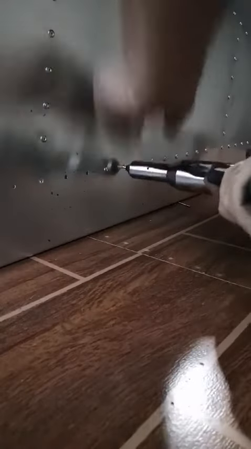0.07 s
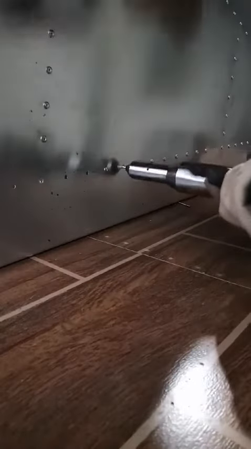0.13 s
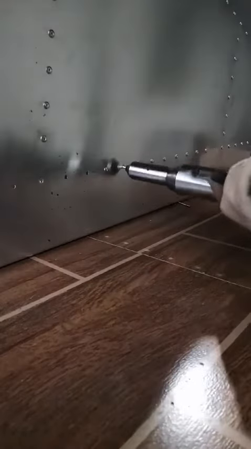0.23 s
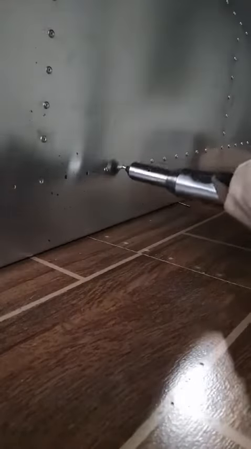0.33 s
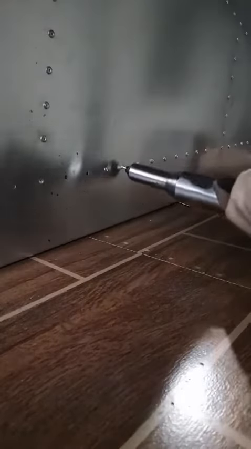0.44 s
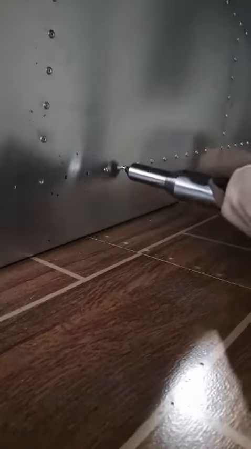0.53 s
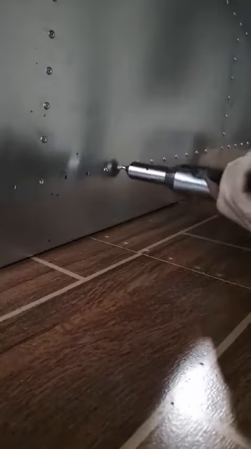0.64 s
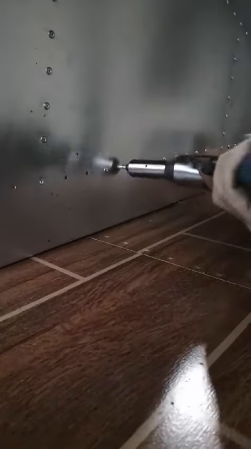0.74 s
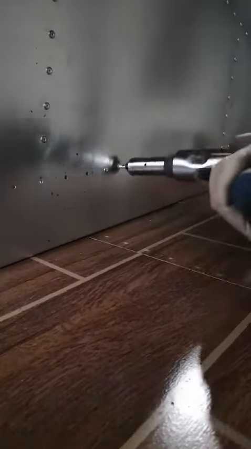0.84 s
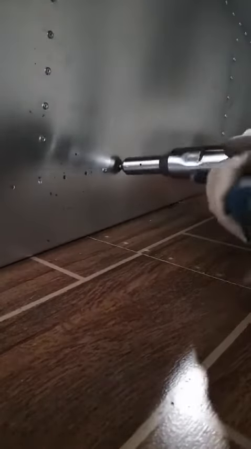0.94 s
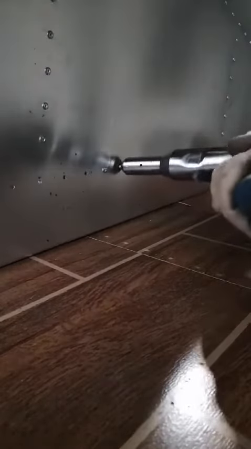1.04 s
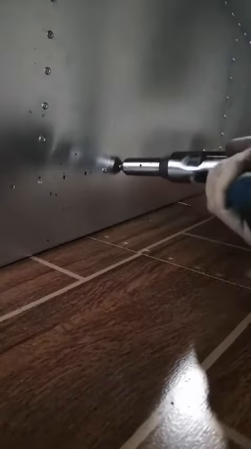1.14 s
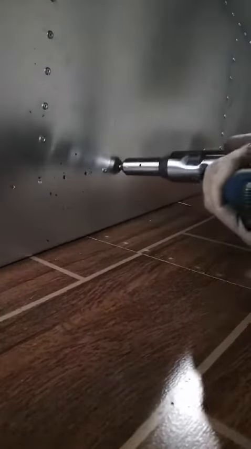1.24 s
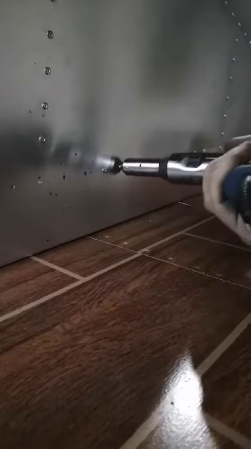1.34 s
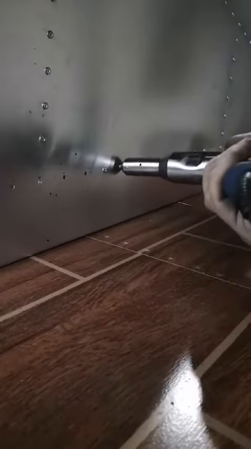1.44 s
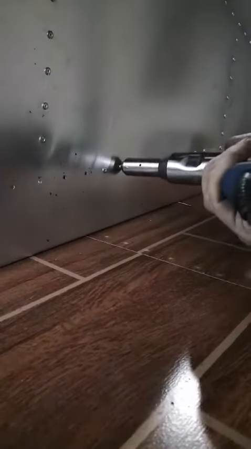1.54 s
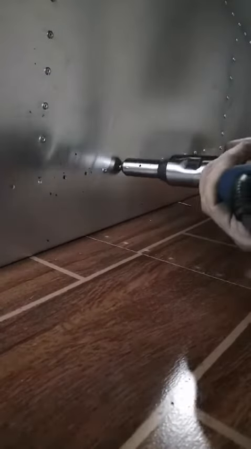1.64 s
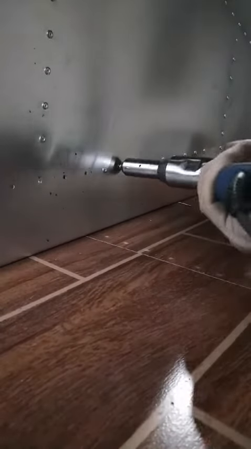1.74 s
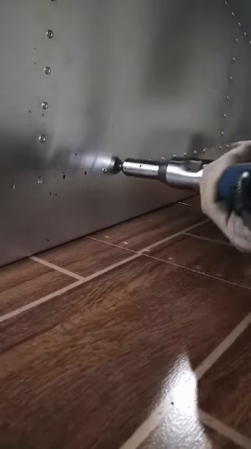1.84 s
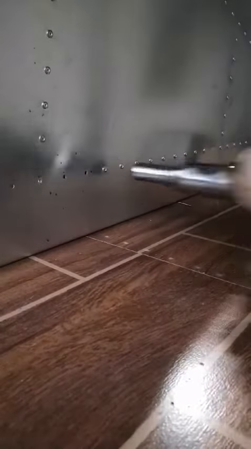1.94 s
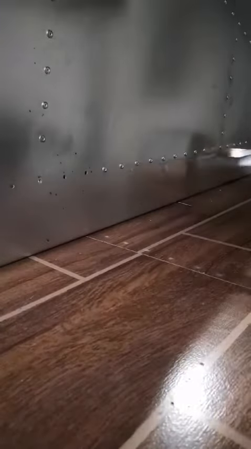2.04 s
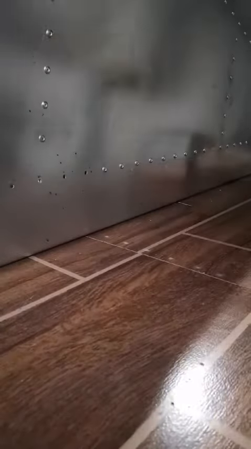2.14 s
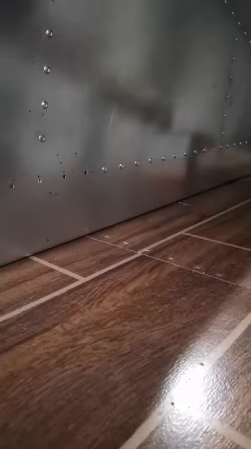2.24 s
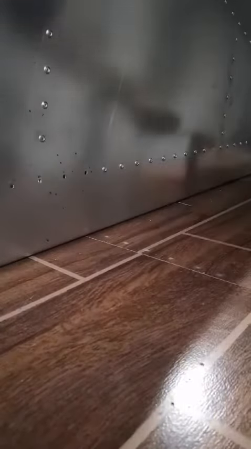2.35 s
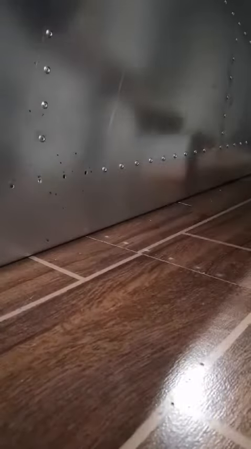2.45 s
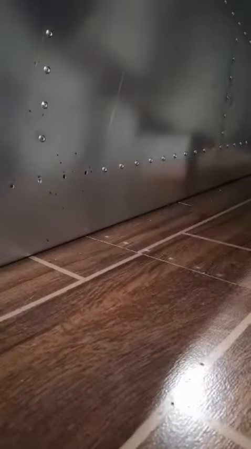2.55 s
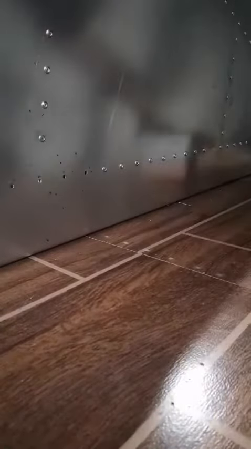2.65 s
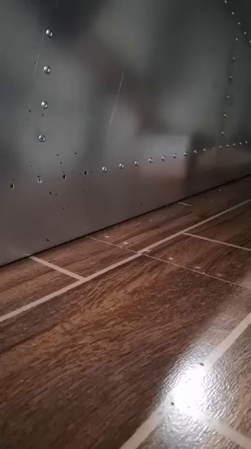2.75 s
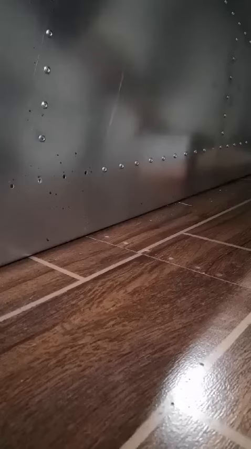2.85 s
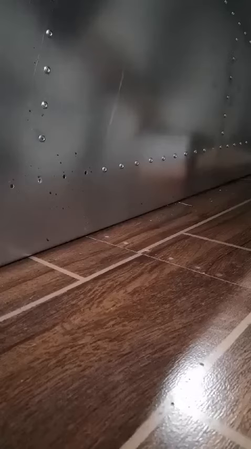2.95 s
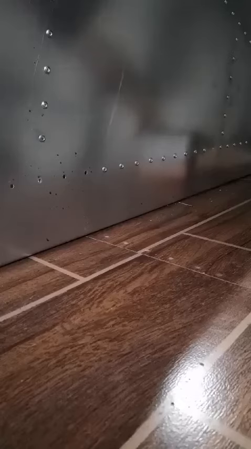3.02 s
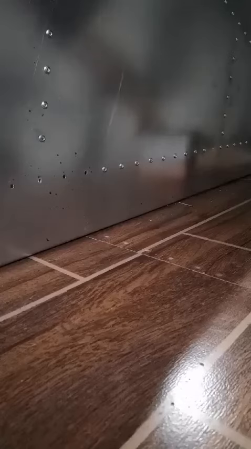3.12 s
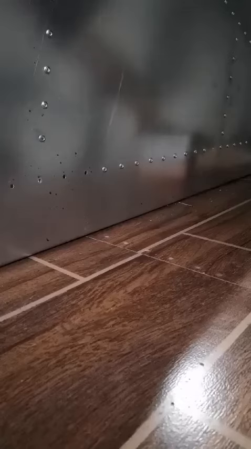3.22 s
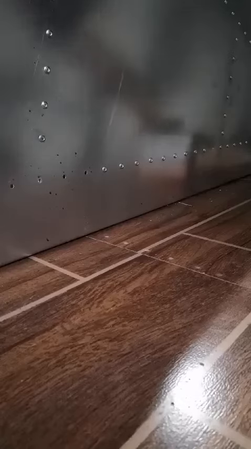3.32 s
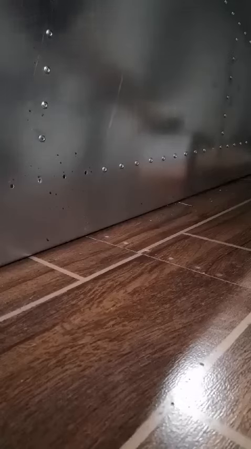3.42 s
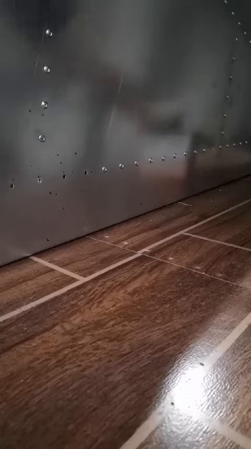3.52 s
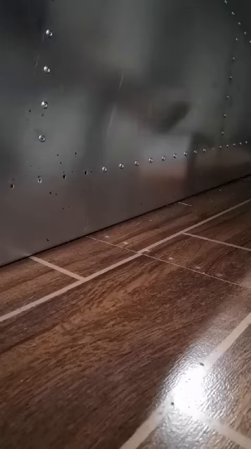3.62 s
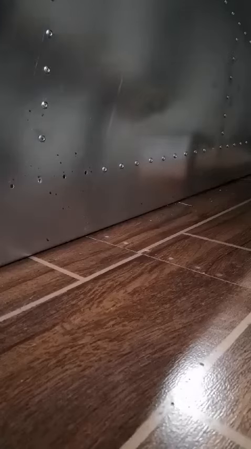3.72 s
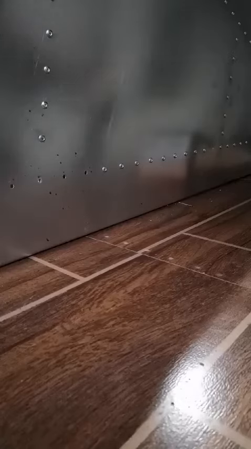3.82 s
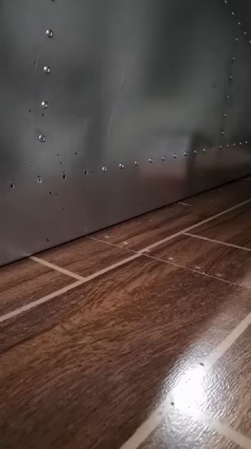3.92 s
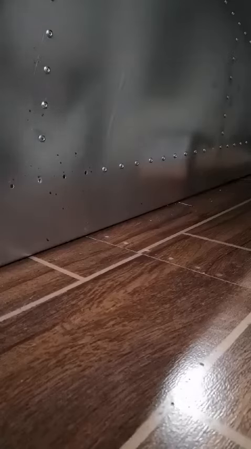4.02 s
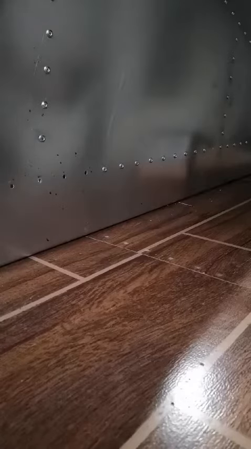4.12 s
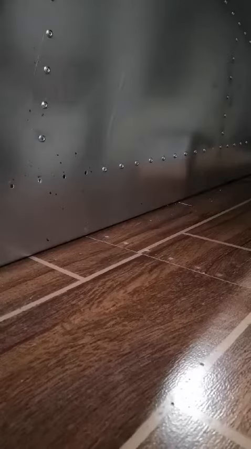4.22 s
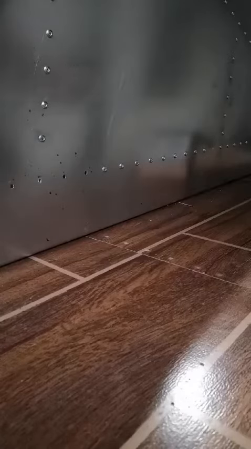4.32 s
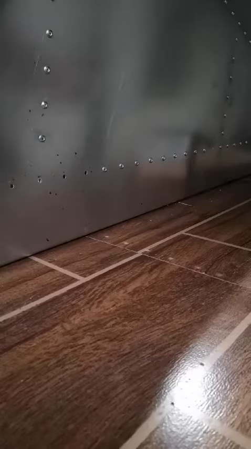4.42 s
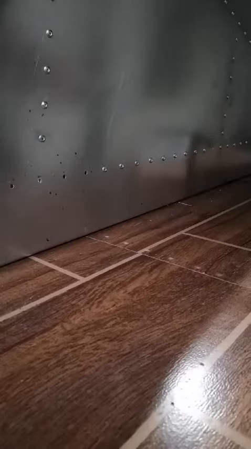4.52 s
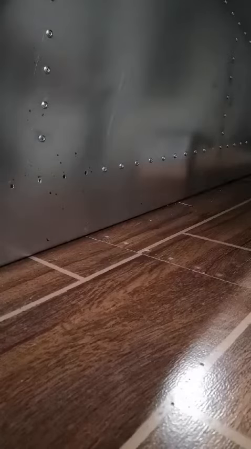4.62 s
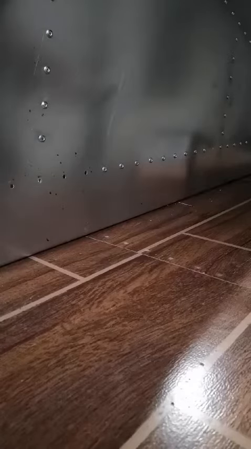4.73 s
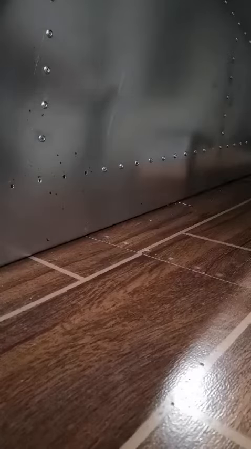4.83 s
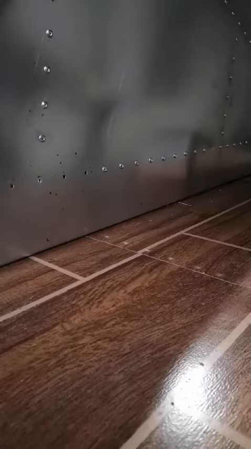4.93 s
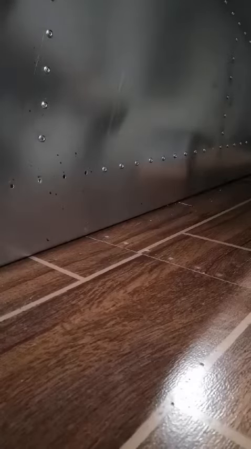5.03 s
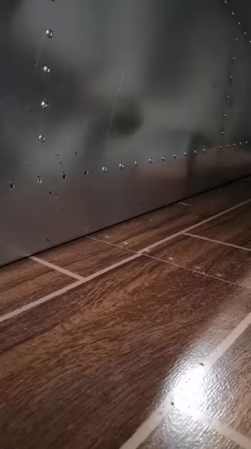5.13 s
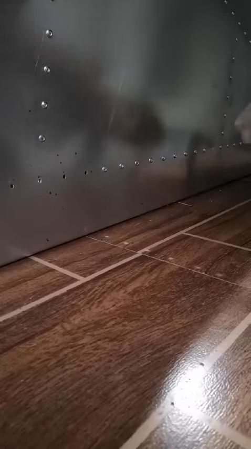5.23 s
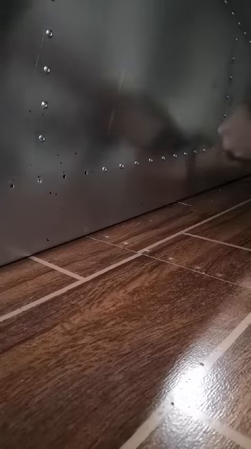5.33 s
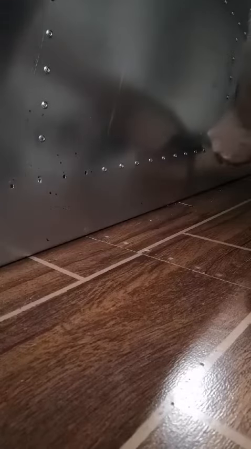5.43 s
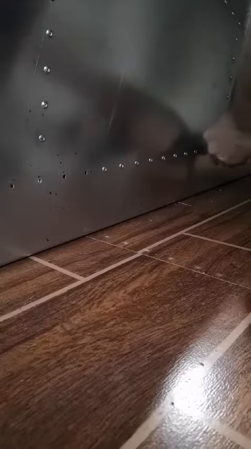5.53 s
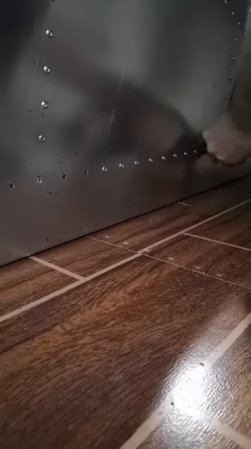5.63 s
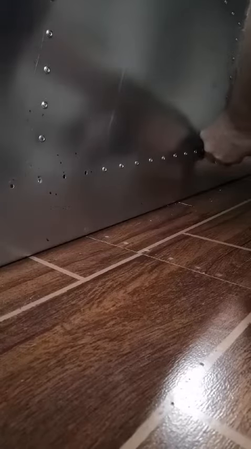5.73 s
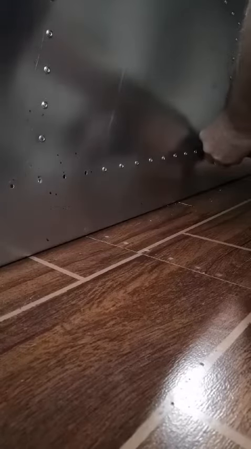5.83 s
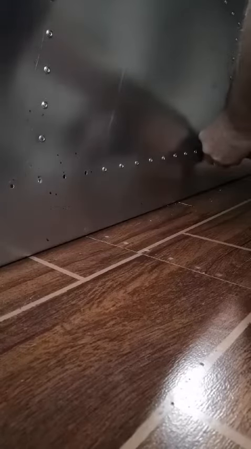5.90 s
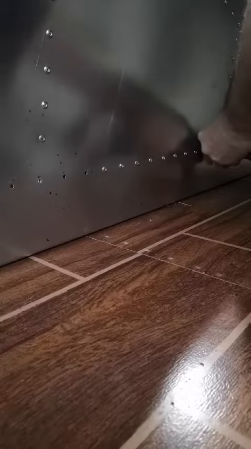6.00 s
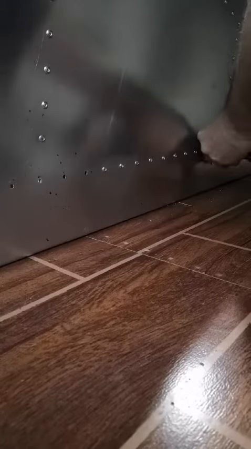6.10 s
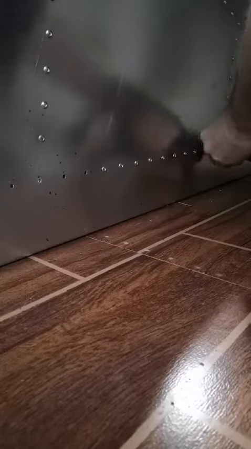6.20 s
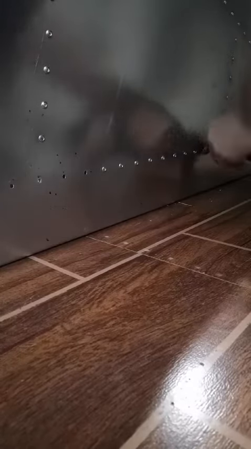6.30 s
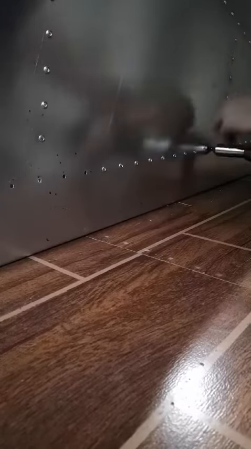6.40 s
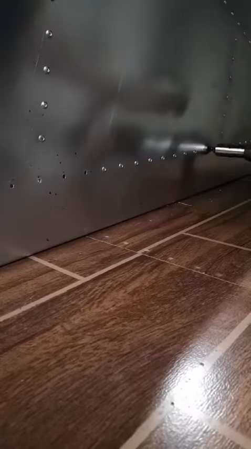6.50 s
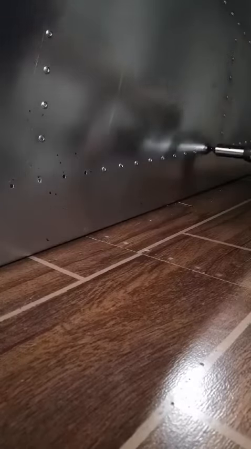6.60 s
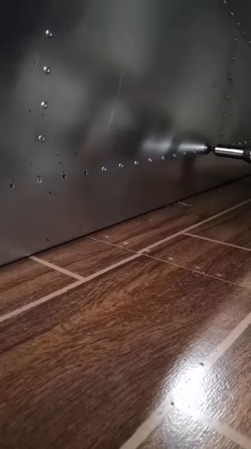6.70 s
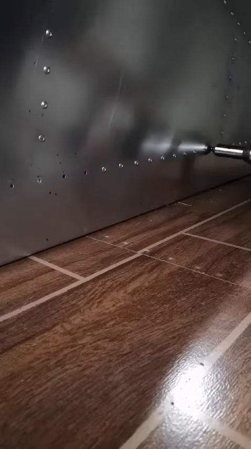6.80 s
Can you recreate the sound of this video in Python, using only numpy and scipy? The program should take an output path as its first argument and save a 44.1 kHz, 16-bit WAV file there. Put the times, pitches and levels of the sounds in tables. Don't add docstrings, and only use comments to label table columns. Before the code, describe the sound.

Steady compressed-air hiss with a high motor whine, dull booming bumps on sheet metal, a brief sagging pull, and a sharp metallic clack.

```python
import sys
import numpy as np
from scipy import signal
from scipy.fft import rfft, irfft, next_fast_len
from scipy.io import wavfile
from scipy.ndimage import uniform_filter1d, map_coordinates

SR = 44100
rng = np.random.default_rng(int(sys.argv[2]) if len(sys.argv) > 2 else 0)


def waveform_to_disk(signal):
    frames = np.transpose(np.atleast_2d(signal))
    scaled = np.clip(frames, -1, 1) * 32767
    samples = np.round(scaled).astype(np.int16)
    wavfile.write(sys.argv[1], SR, samples)


def ratio_of_db(decibels):
    return 10 ** (np.asarray(decibels, float) / 20)


N = 302526

# time in seconds, exhaust level in dB, nearness to the sheet in dB,
# aim left over right in dB, nozzle turned to the phone in dB.
HOLDING = [(0, -25, 4, 1.5, 2), (.45, -23.5, 4.5, 1, 2), (.9, -23.5, 1, 0.5, -0.5),
           (1.15, -21.5, 0.5, 1.5, -1), (1.5, -23, 1, 2.5, 0), (2.0, -22, -3.5, 6, -1),
           (2.3, -26, -7, -2, 2), (2.5, -26.5, -2.5, -5.5, 0), (3.0, -27, -3.5, -6, 1),
           (3.35, -27, -4, -3.5, 1.5), (3.8, -28.5, 0, -1, 2), (4.1, -28.5, -4, -3.5, -0.5),
           (4.6, -27.5, -3.5, 1, -3), (5.0, -27.5, -1, -2.5, -2.5), (5.26, -26.5, 1.5, 7, -3.5),
           (5.55, -26, 5.5, 1, 4.5), (6.3, -25, 2, 1.5, 2.5), (6.86, -24.5, 0.5, 0.5, 3.5)]
# frequency in Hz, width in Hz, level in dB.
SHEET_MODES = [(95.6, 23.6, -3), (135, 58, -1), (178.4, 43, 0.5), (228.4, 41.5, -3), (300, 56, -4),
               (402, 160, -8.5), (504, 98, -5.5), (830, 27, -30.5)]
GRIP_S, SNAP_S, BITE_S = 1.56, 1.81, 0.015
PORT_DELAY_S = 26 / SR
ASIDE_S = 2


def fizz_level():
    return curves(HOLDING)[1 - 1] + 1 * load()


def air():
    # frequency in Hz, level in dB per Hz.
    left_colour = [(420, -10), (640, -4), (1100, 3.5), (1350, 5.5), (1800, 10), (2200, 6.5), (2750, 11),
                   (3200, 4), (4400, 3.5), (7000, 3.5), (9200, 1), (10500, -3.5), (12000, -9.5),
                   (14900, -18)]
    right_colour = [(420, -48), (560, 4), (690, -13.5), (820, 2.5), (1100, 4.5), (1260, 1.5), (1580, 10),
                    (1820, 14), (2150, 12), (2750, 6), (3200, -2.5), (9500, -10), (10500, -20),
                    (14900, -23)]
    # frequency in Hz, likeness from 0 to 1.
    likeness = [(400, 0.61), (700, 1), (1500, 0.94), (2600, 0.66), (3400, 0.39), (6000, 0.55),
                (11000, 0.033)]
    # frequency in Hz, phase in radians.
    port_phase = [(300, -25), (480, -1.5), (580, 0.97), (760, -1.2), (960, 0.4), (1180, 0.28), (1500, -1.5),
                  (1900, 0.9), (2250, 0.54), (3000, -0.07), (5000, -1.5)]
    # frequency in Hz, level in dB.
    housing = [(560, 0), (650, -4), (760, 1), (1000, 0), (1170, 2), (1330, 0), (1570, -2.5), (1700, 1.5),
               (1900, 2.5), (2090, -4), (2350, 0)]

    _, near_db, aim_db, facing_db = curves(HOLDING)
    fizz_db = fizz_level()
    pan_db = aim_db + 1.5 * load()

    def part_db(base_db, per_near_db, at_load_db):
        return base_db + per_near_db * near_db + at_load_db * load()

    def alike(hz):
        return np.clip(along(likeness, hz), 0, 1)

    def late(hz):
        return np.exp(-1j * (2 * np.pi * hz * PORT_DELAY_S + along(port_phase, hz)))

    def colour(hz):
        ports_db = [along(left_colour, hz), along(right_colour, hz)]
        return ratio_of_db(ports_db + along(housing, hz)) * (hz > 330)

    def scale(part):
        return part / np.std(part.mean(axis=0))

    left, other = patchy(fine_db=1.5, broad_db=3.5)
    shared = filtered(left, lambda hz: alike(hz) * late(hz))
    own = filtered(other, lambda hz: np.sqrt(1 - alike(hz) ** 2))
    jet = filtered(np.array([left, shared + own]), colour)

    # crossovers, 100 Hz wide, cut the jet into five parts
    below = [filtered(jet, lambda hz: np.clip((edge + 50 - hz) / 100, 0, 1)) for edge in (1040, 1500, 2150, 3200)]
    drone, roar, whistle, nose, fizz = np.diff([0 * jet, *below, jet], axis=0)

    body = ratio_of_db(part_db(-6, 1, -9.5)) * scale(roar)
    body = body + ratio_of_db(part_db(0, 0.01, -6.5) + facing_db + 0.25 * wobble(60)) * scale(whistle)
    body = body + ratio_of_db(part_db(-5, 0.05, -4)) * scale(nose)
    flutter = ratio_of_db(0.32 * wobble(12) + 0.51 * wobble(45) + 0.69 * wobble(120))
    aimed_body = panned(0.98, 0.78 * pan_db) * body
    hiss = ratio_of_db(fizz_db) * (flutter * scale(fizz) + flutter ** 0.93 * aimed_body)

    thinning_db = -3.5 * (np.arange(N) > ASIDE_S * SR)
    spared_db = -0.98 * creep()
    drone_db = part_db(-40, 0.15, -1.1) + thinning_db + spared_db + 1.4 * wobble(4.84)
    return hiss + ratio_of_db(drone_db) * scale(drone)


def patchy(fine_db, broad_db):
    # time in seconds, peak off the sheet in Hz,
    # peak off the hand in Hz, level off the hand in dB.
    mirror_paths = [(0, 9500, 4150, 1.5), (.86, 9000, 4400, 1.5), (1.3, 9300, 5100, 4),
                    (1.57, 8950, 4000, -0.5), (1.95, 8900, 3500, 6), (2.3, 9400, 3930, -1),
                    (4.1, 8870, 4300, 0.5), (4.6, 10060, 4300, 1.5), (5.1, 8950, 4140, 0.5),
                    (6.86, 9000, 3920, 2)]
    hz, t, z = signal.stft(rng.standard_normal((2, N)), SR, nperseg=512)
    s, *cols = np.transpose(mirror_paths)
    sheet_hz, hand_hz, hand_db = [np.interp(t, s, c) for c in cols]
    rows_hz = hz[:, None]

    def blur(bins, frames):
        smooth = uniform_filter1d(rng.standard_normal(z.shape), bins, 1)
        return unit(uniform_filter1d(smooth, frames, 2))

    def hat(off):
        return np.cos(np.pi * off) * np.exp(-off ** 2 / 2)

    bands_db = broad_db * along([(2000, .2), (4000, 1)], hz)[:, None] * blur(4, 70)
    glare_db = 3 * hat((rows_hz - sheet_hz) / 1700) + hand_db * hat((rows_hz - hand_hz) / 1000)
    corner_db = 3.6 * np.exp(-((rows_hz - 1560) / 140) ** 2) * (t < ASIDE_S)
    shifted = z * ratio_of_db(fine_db * blur(9, 5) + bands_db + glare_db + corner_db)
    return signal.istft(shifted, nperseg=512)[1][:, :N]


def motor():
    # time in seconds, speed in turns per second.
    speed = [(0, 492), (1.56, 492), (1.65, 480), (1.72, 464), (1.8, 447), (2.0, 452.5), (2.16, 457.8),
             (2.4, 465), (2.65, 477), (3.0, 483), (3.4, 487), (3.8, 490.5), (4.3, 491.5), (6.86, 492)]
    # time in seconds, level in dB.
    humming = [(0, -31.5), (.19, -28), (.38, -29.5), (.44, -37), (.72, -32), (.84, -21), (.98, -22.5),
               (1.18, -19), (1.55, -26), (1.7, -35.5), (1.76, -43), (1.82, -31), (2.25, -36), (2.77, -43.5),
               (3.8, -34.5), (5.0, -36), (5.8, -26.5), (6.86, -26.5)]
    # multiple of the shaft, level over the fizz in dB, left over right in dB.
    whine = [(2, -23, -3), (3, -21, -2), (5, -23, 2), (10, -28, 8), (11, -26, 8), (11.71, -28, 8),
             (12, -21, 8), (13.22, -23, 9), (15.63, -24, 10), (18.06, -20, 11), (19.53, -28, 11),
             (20.88, -27, 14), (21.6, -30, 12), (29, -35, 20)]
    # multiple of the shaft, level in dB, left over right in dB.
    gear_orders = [(4.42, -33, -2), (5.885, -22, 5), (6.97, -28, 5), (7.35, -31, 5), (9.05, -33, 6),
                   (11.6, -34, 8), (13.95, -30, 9)]

    turn = 2 * np.pi * np.cumsum(curves(speed)[0]) / SR
    level = ratio_of_db(curves(humming)[0] + 1.5 + 0.33 * wobble(8.1) + 0.65 * wobble(22))
    port_drift = np.array([[-.3], [.3]]) + .2 * np.array([wobble(3), wobble(3)])
    fundamental = panned(level, -5.5) * np.sin(turn + .15 * wobble(30) + port_drift)

    free = 0
    for k, db, pan_db in whine:
        looseness = .06 if k % 1 == 0 else .16
        shake = looseness * k ** .7 * wobble(60)
        lag = rng.uniform(.6, 1.6) + 1.3 * (k == 2)
        line = np.sin(k * turn + shake + [[0], [lag]])
        free = free + panned(line * ratio_of_db(db + 2.5 * wobble(4)), pan_db)

    gears = 0
    for k, db, pan_db in gear_orders:
        line = np.sin(k * turn + .3 * wobble(40) + [[0], [1]])
        strain_db = (k > 6) * 6 * (load() - .5)
        gears = gears + panned(line * ratio_of_db(db + strain_db + 1.2 * wobble(25)), pan_db)

    bite = np.clip(load() * (SNAP_S - GRIP_S) / BITE_S, 0, 1)
    return fundamental + ratio_of_db(fizz_level() + 6.0) * free + bite * gears


def load():
    t = np.arange(N) / SR
    return (t - GRIP_S) / (SNAP_S - GRIP_S) * (t > GRIP_S) * (t < SNAP_S)


def stem():
    # frequency in Hz, width in Hz, level in dB, left over right in dB.
    stem_modes = [(1700, 100, 0, -8), (2610, 150, -3, 11), (2840, 150, 2, 5), (3780, 160, -4, 13),
                  (6100, 230, -5, 18), (8960, 330, -23, -3)]
    drop_s, drop_db, closing_ms = 2.3213, -7.5, 3.6
    t = np.arange(N) / SR - drop_s
    chatter = .1 * rng.standard_normal(N) * (t > 0) * (t < .02)
    blows = (np.arange(N) == round(drop_s * SR)) + chatter
    ports = np.array([blows, np.roll(blows, round(PORT_DELAY_S * SR))])

    def steel(f):
        return sum(panned(modes([(hz, width, db)])(f), pan_db) for hz, width, db, pan_db in stem_modes)

    clack = filtered(ports, lambda f: steel(f) / (1 + 1j * f / 7000) ** 2)
    clack /= np.std(clack[:, (t > 0) & (t < .004)])
    gate_ms = [0, closing_ms, closing_ms + 1.2, closing_ms + 6, closing_ms + 10]
    gate_db = np.interp(t * 1000, gate_ms, [-1, 0, -21, -25, -50])
    return clack * ratio_of_db(drop_db + gate_db)


def bumps():
    # start in seconds, peak in dB, contact in ms, tick level in dB.
    contacts = [
        (.9437, -14, .3, -9.5),
        (.466, -17, 1.5, -26),
        (1.804, -15, .6, -19),
        (2.686, -27, .25, -30),
        (5.789, -24, 2.5, -40),
        (6.129, -21, 1.5, -35),
        (6.165, -20, .6, -30),
        (6.771, -19, .7, -28),
    ]
    pushes, ticks, t = np.zeros(N + SR), np.zeros(N + SR), np.arange(2000) / SR
    for s, db, ms, tick_db in contacts:
        start = round(s * SR)
        push = t / ms * np.exp(-1000 * t / ms)
        pushes[start:][:len(t)] += ratio_of_db(db + 41.0) * push / push.sum()
        grit = rng.standard_normal(len(t)) + 7 * (t == 0)
        ticks[start:][:len(t)] += ratio_of_db(tick_db - 60 * t / .05) * grit
    tick = filtered(ticks[:N], modes([(2050, 630, 13), (1010, 1500, -7), (5300, 2500, -7)]))
    return filtered(pushes[:N], modes(SHEET_MODES)) + tick


def edge_waves():
    # time in seconds, peak in dB, frequency in Hz, length in ms.
    returns = [(.475, -16.5, 190, 6.3), (.961, -14, 300, 5), (0.976, -9, 185, 7), (1.031, -15.5, 164, 15),
               (1.05, -11, 199, 7.3), (1.101, -13, 90, 4.2), (1.148, -18.5, 161, 38),
               (1.221, -16, 141, 6.6), (1.36, -26.5, 101, 17), (6.204, -23, 135, 16), (6.289, -30, 129, 15)]
    now = np.arange(N) / SR
    waves = np.zeros(N)
    for s, db, hz, ms in returns:
        swell = np.exp(-(1000 * (now - s) / ms) ** 2)
        waves += ratio_of_db(db) * swell * np.cos(2 * np.pi * hz * (now - s))
    return waves


def sheet_rumble():
    # time in seconds, level in dB, rise in seconds, t60 in seconds.
    shakes = [(.48, -32, 0.029, 0.9), (.94, -29, .15, .3), (.96, -21, .01, 0.46), (1.08, -25.5, .06, 2.2),
              (1.6, -38, .05, .5), (1.74, -34, 0.044, .4), (1.82, -28, 0.024, 0.67), (.1, -43.5, .2, 12),
              (2.19, -42, 0.072, 1), (2.69, -44, 0.0088, 0.23), (5.8, -36.5, 0.022, 1.2),
              (6.03, -33.5, 0.066, 0.74), (6.18, -23.5, 0.092, 0.52), (6.3, -36.5, .1, 8.5),
              (6.79, -24, .015, 0.28)]
    flex_db = swells(shakes, -51 + 0.43 * curves(HOLDING)[1])
    rumble = unit(filtered(rng.standard_normal(N), modes(SHEET_MODES)))

    def upper_modes(hz):
        return modes(SHEET_MODES[2:])(hz) * hz ** 2 / (hz ** 2 + 60 ** 2)

    apart = unit(filtered(rng.standard_normal(N), upper_modes))
    return ratio_of_db(flex_db + 1.0 + 0.8 * wobble(14)) * rumble + ratio_of_db(flex_db - 16) * apart * [[1], [-1]]


def low_hum():
    # frequency in Hz, level in dB per Hz.
    hum_colour = [(12, -17), (30, -6), (45, 0.5), (56, -2.5), (66, -2), (85, -24.5)]
    # time in seconds, level in dB, rise in seconds, t60 in seconds.
    hum_swells = [(.5, -35.5, .03, 1.5), (1.05, -28.5, 0.066, 1.7), (1.32, -31.5, .12, 1.3),
                  (2.0, -38, .06, .6), (2.19, -34, .06, .5), (2.5, -38.5, .07, 6.2),
                  (5.55, -46, 0.092, 1.2), (5.85, -44, 0.079, .8), (6.2, -44, .05, 1.5)]
    hum_db = swells(hum_swells, -48) + 1.5 * wobble(7.4)
    now = np.arange(N) / SR
    machine = ratio_of_db(-2.5) * np.sin(2 * np.pi * 58 * now + 3.5 * wobble(3))
    broad = unit(filtered(rng.standard_normal(N), lambda hz: ratio_of_db(along(hum_colour, hz))))
    return ratio_of_db(hum_db) * (machine + ratio_of_db(-2) * broad)


def swells(rows, rest_db):
    t = np.arange(0, N + 32, 32) / SR
    power = 0
    for s, db, rise, t60 in rows:
        fall_db = np.where(t < s, 20 * (s - t) / rise, 60 * (t - s) / t60)
        power = power + ratio_of_db(2 * (db - fall_db))
    return 10 * np.log10(np.interp(np.arange(N) / SR, t, power) + ratio_of_db(2 * rest_db))


def creep():
    # time in seconds, depth in dB, time constant in seconds.
    drops = [
        (0.947, -7.5, 0.33),
        (1.812, -7.5, 0.099),
        (2.3246, -9, 1),
        (2.3255, -3, .15),
    ]
    t = np.arange(N) / SR
    return sum(db * np.exp(-np.abs(t - s) / tau) * (t >= s) for s, db, tau in drops)


def duck():
    # time of the blow in seconds, depth in dB, lead in seconds.
    dips = [
        (.9437, -10, .012),
        (2.3213, -10, .008),
    ]
    t = np.arange(N) / SR
    return sum(np.interp(t - s, [-lead, -lead / 3, -.0002, 0], [0, db, db, 0]) for s, db, lead in dips)


def starve(x):
    # frequency in Hz, share of the time silent at the left, and at the right.
    silent_share = [(3000, 0, .01), (9800, 0, .05), (10500, 0, .5), (11500, .02, .85), (12300, .35, .95),
                    (13000, .45, .55), (13700, .8, .9), (14250, .1, .8), (14700, .55, .7)]
    hz, t, z = signal.stft(x, SR, nperseg=2048)
    luck = uniform_filter1d(rng.standard_normal((2, 65, len(t))), size=5, axis=2)
    rank = luck.argsort(axis=2).argsort(axis=2) / len(t)
    f, *shares = np.transpose(silent_share)
    band_hz = hz // (SR / 128) * SR / 128 + 170
    silent = np.array([np.interp(band_hz, f, share) for share in shares])
    keep = rank[:, np.arange(len(hz)) // 16] >= silent[..., None]
    return signal.istft(z * keep * (hz < 15050)[:, None], SR, nperseg=2048)[1][:, :N]


def unit(x):
    return x / np.sqrt(np.mean(x ** 2) + 1e-20)


def along(points, hz):
    f, v = np.transpose(points)
    return np.interp(np.log(hz + 1), np.log(f + 1), v)


def curves(rows):
    s, *cols = np.transpose(rows)
    return [np.interp(np.arange(N) / SR, s, c) for c in cols]


def wobble(rate):
    steps = np.arange(0, N + 32, 32)
    knots = rng.standard_normal(int(N * rate / SR) + 4)
    return np.interp(np.arange(N), steps, map_coordinates(knots, [steps * rate / SR]))


def filtered(x, response):
    m = next_fast_len(N + SR // 2)
    return irfft(rfft(x, m) * response(np.fft.rfftfreq(m, 1 / SR)), m)[..., :N]


def modes(table):
    def response(f):
        total = 0
        for k, (centre, width, db) in enumerate(table):
            damping = 1j * f * width
            total = total + (-1) ** k * ratio_of_db(db) * damping / (centre * centre - f * f + damping)
        return total
    return response


def panned(x, db):
    return x * ratio_of_db(np.array([db / 2, -db / 2]).reshape(2, -1))


def scene():
    tool = air() + motor()
    sheet = bumps() + edge_waves() + sheet_rumble() + low_hum()
    return ratio_of_db(duck()) * (ratio_of_db(creep()) * tool + sheet) + stem()


def low_pass(x):
    return signal.sosfilt(signal.butter(12, 15680, fs=SR, output="sos"), x)


def record(dry):
    clipped = dry / (1 + np.abs(dry) ** 14) ** (1 / 14)
    return low_pass(starve(clipped))


dry = scene()
out = record(dry)
waveform_to_disk(out)
```